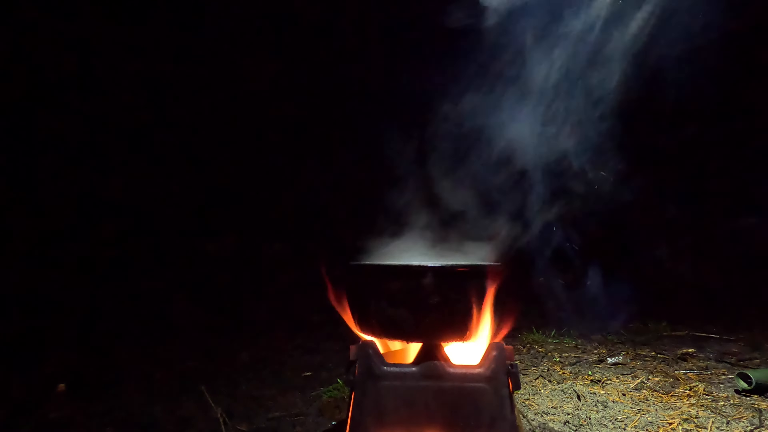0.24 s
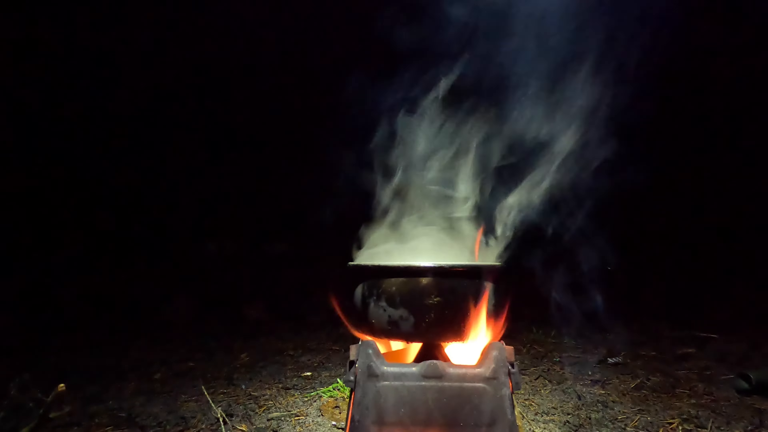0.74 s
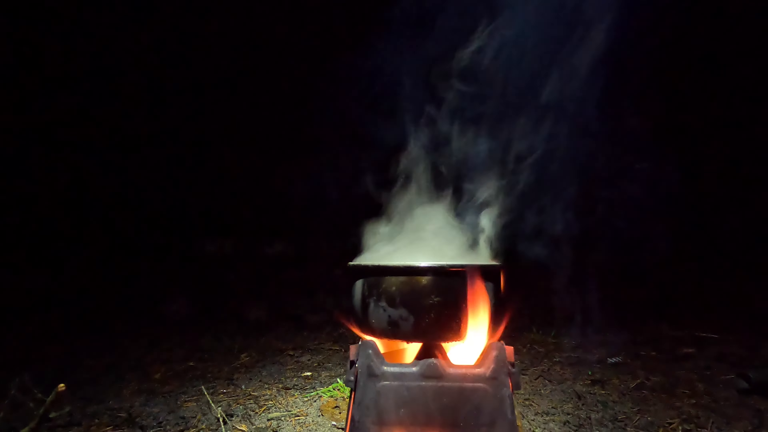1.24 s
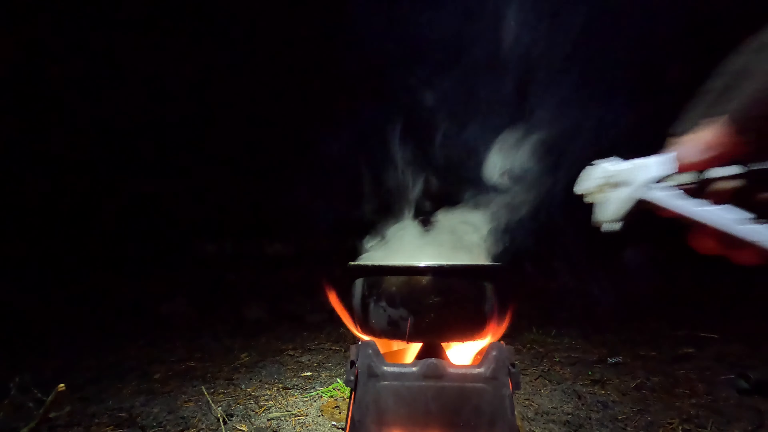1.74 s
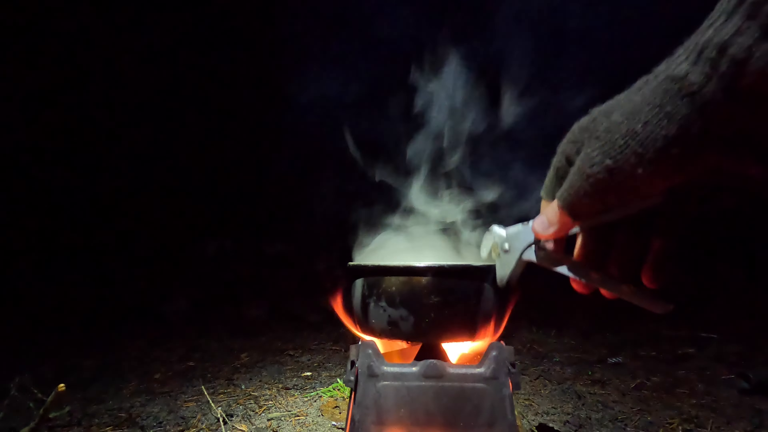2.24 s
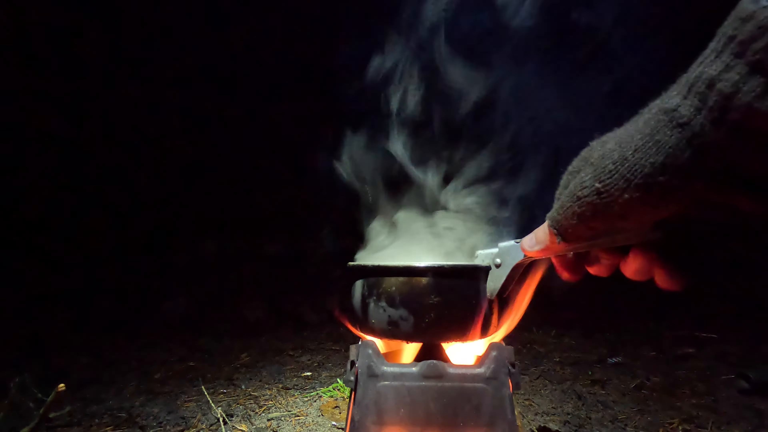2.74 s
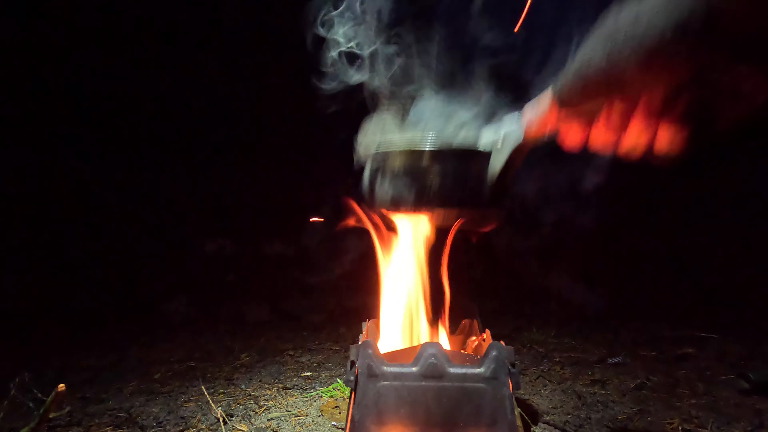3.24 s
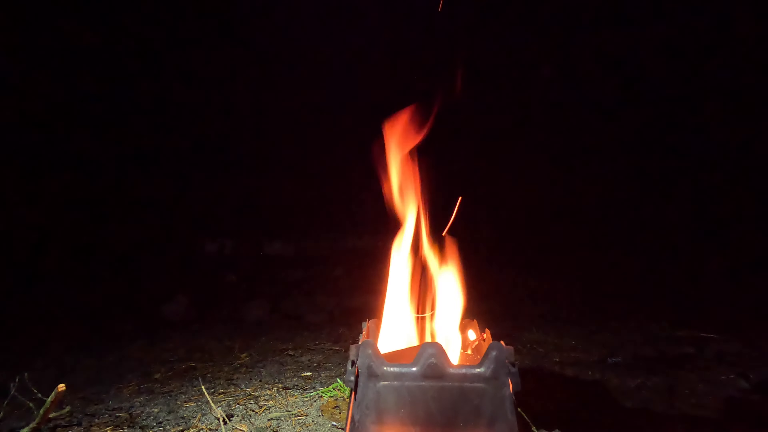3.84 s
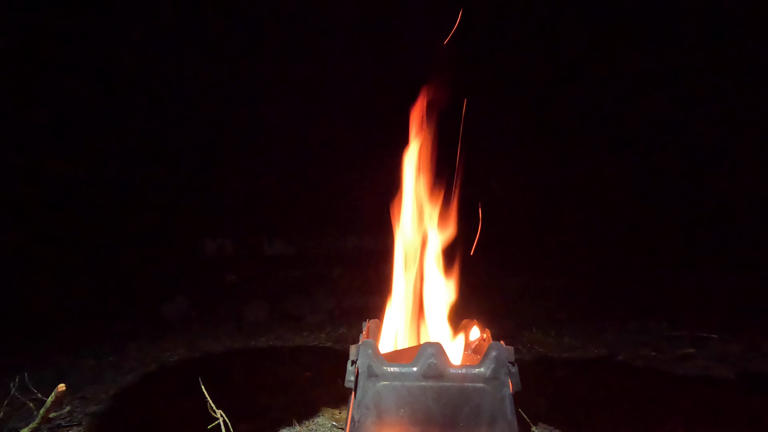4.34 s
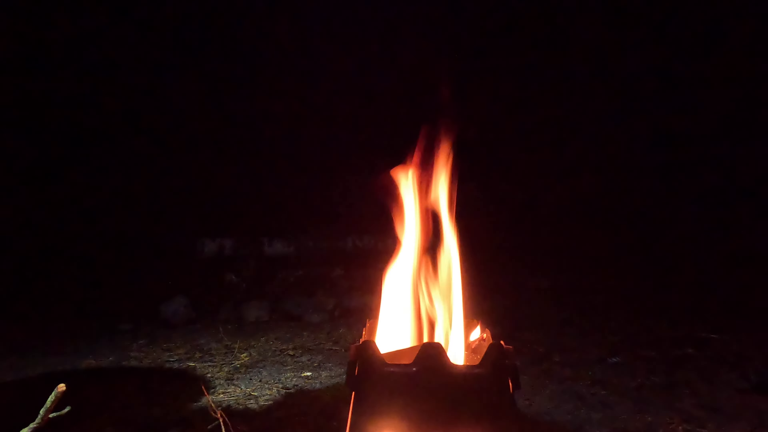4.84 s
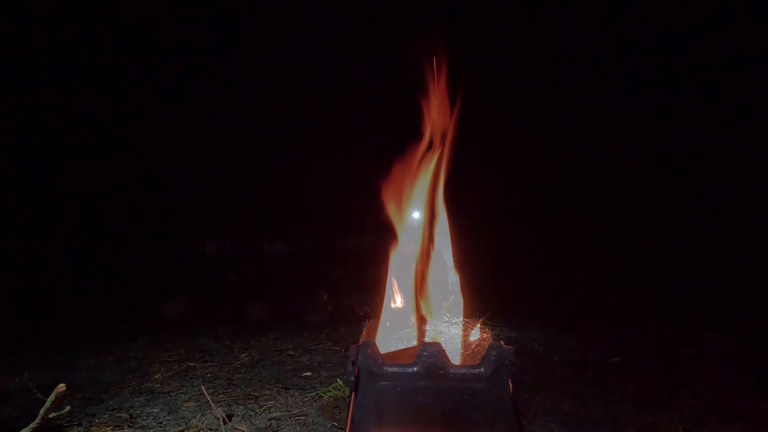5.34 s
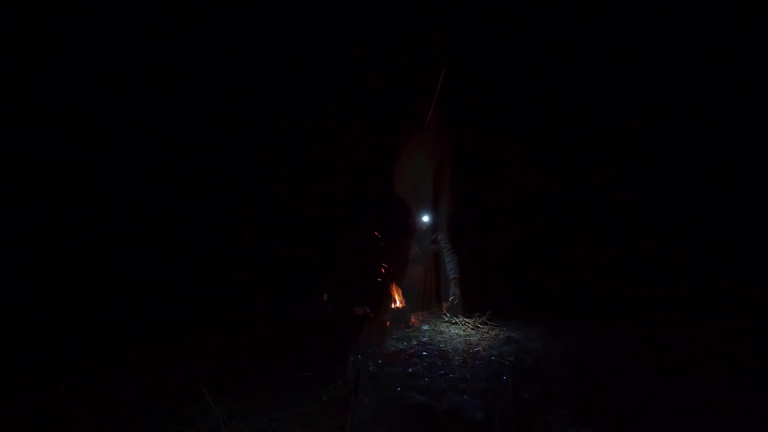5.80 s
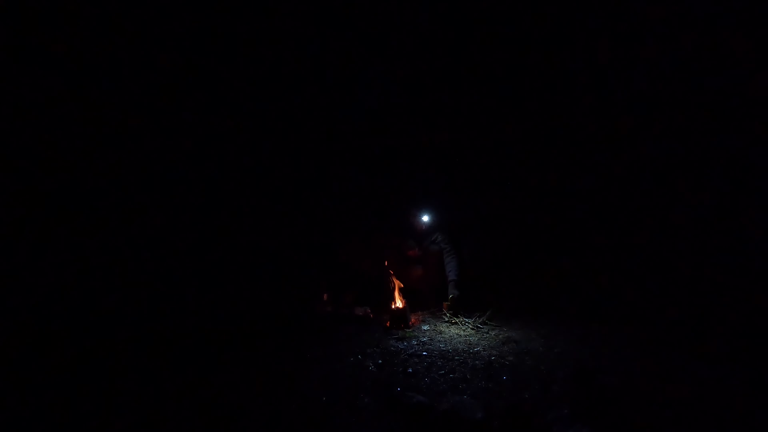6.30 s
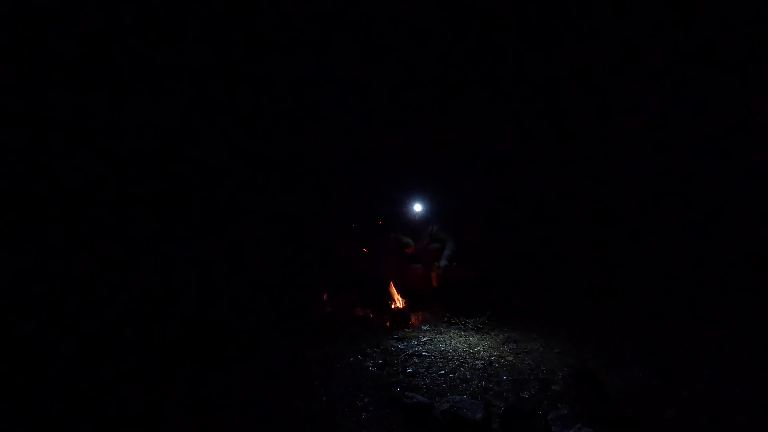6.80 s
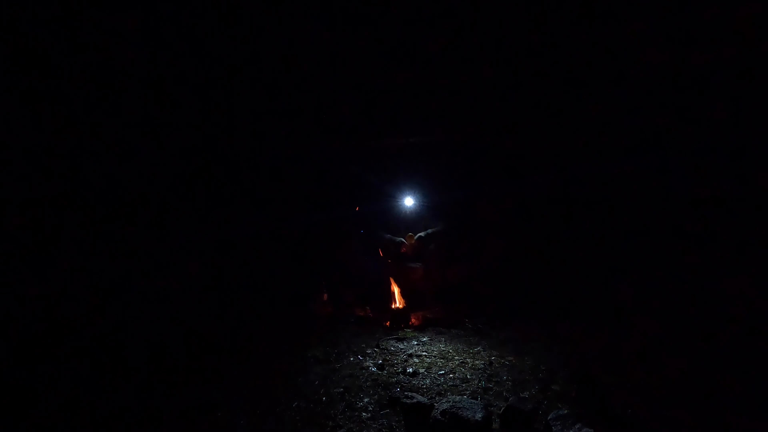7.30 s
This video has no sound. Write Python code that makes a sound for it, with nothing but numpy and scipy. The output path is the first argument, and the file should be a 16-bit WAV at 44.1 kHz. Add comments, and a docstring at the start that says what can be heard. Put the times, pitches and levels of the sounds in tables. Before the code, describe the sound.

Crackling stove fire with a faint simmering pot, small metal clinks, a gripper's clack, and irregular water drops tapping stretched cloth overhead.

```python
"""Twig stove under a tarp, wet forest, night

Wood snaps are noise bursts with two echoes; stray drops thud on the cloth as bursts with overtones.
A metal lid is set down, a gripper knocks on the pot and its jaw chatters: contacts drive decaying modes.
Coloured noise makes flame rumble, drone, sizzle and hiss; resonant noise the simmer, ringing ticks the spits.
Simmer fades from midway; flame, sizzle and hiss sink later, the drone stays."""
import sys
import numpy as np
from scipy import signal
from scipy.fft import rfft, irfft, next_fast_len
from scipy.io import wavfile

SR = 44100
rng = np.random.default_rng(int(sys.argv[2]) if len(sys.argv) > 2 else 0)


def output_pcm(signal):
    """Save a mono or channel-first signal as 16-bit PCM at the path in sys.argv[1].

    Samples are clipped to [-1, 1] before scaling.
    """
    pcm = np.clip(np.atleast_2d(signal).T, -1, 1) * 32767
    wavfile.write(sys.argv[1], SR, np.round(pcm).astype(np.int16))


N = 333376

# Loud wood snaps: (time [s], mid-band level [dB], treble level [dB], treble pitch [Hz], left over right [dB])
SNAPS = [(0.066, -33, -48, 5800, 0.1), (0.0822, -27.5, -15.5, 8040, 0), (.3547, -16, -12, 6800, -1),
         (0.7466, -32.5, -59, 6000, -8), (1.845, -50, -38, 7500, 3), (1.9152, -48, -29.5, 7600, -0.5),
         (2.0908, -42, -35, 7000, -2), (2.2089, -46, -32.5, 7950, -4), (2.234, -19.5, -12.5, 6950, -1),
         (2.3138, -29, -16, 7500, -1), (2.4336, -39, -33, 9000, -1), (2.8537, -36, -25, 6600, 0.5),
         (2.9655, -18, -13.5, 6740, -2.5), (3.0691, -40, -29.5, 9300, -2), (3.329, -31, -34, 6000, -1),
         (3.3563, -37, -28.5, 7200, -4), (3.7476, -41.5, -35, 7100, -6), (3.8871, -45, -36, 6800, -2),
         (4.175, -46, -34.5, 8150, 4), (4.3885, -28.5, -8, 9700, 0.5), (4.5812, -42, -30, 8750, -2),
         (4.9697, -39, -46, 6000, 5), (4.975, -40, -31, 7000, 3), (5.146, -42, -35.5, 8500, 2),
         (5.27, -33.5, -52, 6100, -2), (5.4524, -42, -30.5, 9400, 0), (5.4667, -43, -34, 8300, -3),
         (5.572, -45, -28.5, 9150, -3.5), (5.614, -35, -31.5, 9200, 0), (5.7074, -25.5, -32.5, 5570, -1.5),
         (5.893, -45.5, -40, 7800, 2), (6.2006, -51, -35, 10800, 12), (6.506, -42, -55, 6000, 0.1),
         (6.961, -45, -43, 6900, 4)]
# Flame puffs: (time [s], peak [dB], pitch [Hz])
PUFFS = [(.32, -38, 90.5), (1.166, -39, 81), (1.649, -41.5, 45), (3.47, -35.5, 93.5), (4.762, -42, 70.4),
         (4.871, -38.5, 65), (5.278, -29, 92)]
SMALL_SNAP_DB = -61.5  # at mean vigour, before random size and tone
# Drops on cloth: (time [s], slap level [dB], slap pitch [Hz], thump over slap [dB], overtones over slap [dB],
# splash over slap [dB], length [1 = usual], left over right [dB])
DROPS = [(0.2054, -35, 1280, -29, -17, -40, 1.5, -1), (1.506, -17, 1136, -10.5, 0, -4, 0.94, 2),
         (2.008, -24, 1380, -7.5, 2, -3, 1.2, 1.5), (2.257, -27.5, 1300, -2.5, -10, -32, 1.4, -0.5),
         (2.2909, -21.5, 1050, -11.5, -2.5, -7, 0.7, 2), (2.7763, -34, 1100, 2, -0.5, 0.5, 1.1, 3),
         (3.1825, -21, 1087, -6, -2, -24, .8, 1), (3.662, -41, 874, -8, 7, -2, 1.2, -1),
         (3.7978, -38, 1150, -8, -16, -44, 1, 3), (4.3332, -50.5, 700, -17, 1, 11, 1, -3),
         (4.5475, -39.5, 1880, -11, -3, -6, 1, 3), (5.2756, -55.5, 624, 16, 0, 10, 0.86, -1),
         (5.416, -28, 1373, -14.5, -6.5, -23, 0.73, -1), (5.5961, -35.5, 900, -13.5, 4, -25, 1.7, -0.5),
         (6.0335, -36.5, 1310, -25, -10, 3, 1.1, -0.5), (6.2243, -32.5, 1325, -15.5, 1.5, 9, 0.88, -1.5),
         (6.25, -36, 1085, -39, 5, -6, 1.5, -1), (6.2964, -49.5, 1360, -33, 0.5, 12.5, 1.3, 0),
         (6.4964, -33.5, 920, -15, 2, -2.5, 1, -1.5), (6.596, -47, 1020, -23, -3, -8, 1, -1),
         (6.6428, -40, 800, -21, 3.5, -1, 1.1, -1.5), (6.738, -32, 1344, -1, 1.5, 11.5, 1.4, -0.5),
         (6.7534, -32.5, 1030, -38, 0.5, -10, 1.8, 0), (6.9115, -38, 1270, -13.5, 4, -9, 2.6, -2),
         (7.2758, -48.5, 1300, -9, -0.5, 12.5, 0.91, -1)]
# Decay of a drop of length 1, per band: (t60 [s])
DROP_T60_S = [0.049, 0.035, 0.023, 0.0084]
THUMP_HZ, SPLASH_HZ, DROP_SPREADS_S = 256, 6800, .0012
OVERTONE_STEP = .83  # spacing as share of slap pitch
OVERTONE_WIDTH_HZ, OVERTONE_FALL_DB = 520, 2.5  # width at length 1; fall per overtone

# Burst bands, low to high: (lower edge [Hz], upper edge [Hz])
BANDS_HZ = [(90, 420), (700, 1800), (1800, 4700), (5400, 14500)]
BAND_FILTERS = [signal.butter(2, edges, "band", fs=SR, output="sos") for edges in BANDS_HZ]
# Left-right difference of a burst, per band: (amplitude [share])
WIDTH = [0.011, 0.092, 0.5, 0.014]
# Scattered tail of a burst, per band: (t60 [s])
TAIL_T60_S = [0.18, 0.16, 0.14, 0.094]

# Lid touches: (time [s], level [dB], brightness [dB per octave], rattle decay [s], damping [1 = free], scrape [dB])
LID_HITS = [(.001, -55, -5, 0.0039, 3.5, -50), (.095, -55, -8.5, 0.0049, 5, -46),
            (.287, -50.5, -4.5, 0.008, 0.49, -40.5), (.308, -47.5, 7.5, 0.01, 5.2, -34),
            (.327, -48, -1, 0.0096, 1.9, -32.5), (.41, -50, -5, 0.0146, 1.2, -51),
            (.4275, -39.5, 2.5, 0.016, 1.2, -44), (.45, -40.5, -4.5, 0.0066, 0.84, -45),
            (.4638, -36.5, 8.5, 0.01, 1.44, -21.5), (.574, -40.5, -6.5, 0.00063, 2.8, -32.5),
            (.612, -53, -5.5, 0.00039, 1.6, -33.5), (.66, -77, -5, 0.0019, 0.7, -39)]
# Lid modes: (pitch [Hz], level [dB], t60 at damping 1 [s])
LID = [(665, -5, .35), (1168, -1, .6), (1340, -17, .5), (1397, -5, .1), (1809, -24, .5), (1978, -20, .7),
       (2584, -7, .4), (2950, -23, .6), (3553, -3, .22), (3585, -5, .07), (4430, -16, .22), (4560, -9, .07),
       (5335, -18, .14), (5556, -20, .17), (6056, -17, .06)]
# Holding times that stop the lid ringing: (time [s])
LID_HELD_S = [.345, .574, .662, .72]
LID_DOWN_S = .57
# Change of each lid mode once the lid is down: (level [dB])
LID_DOWN_DB = [7.5, -8.5, -15, 1, 15, 14.5, 5, 19.5, -12, -13, 8, -7, 17, 7, 0.1]
# Gripper on pot: (time [s], level [dB], brightness [dB per octave], rattle decay [s], damping [1 = free], scrape [dB])
POT_HITS = [(2.3255, -31, 2, 0.0019, 1.26, -12), (2.4605, -44, 1, 0.0044, 1.45, -31),
            (2.672, -49.5, 8, 0.02, 3.1, -38)]
# Pot modes: (pitch [Hz], level [dB], t60 at damping 1 [s])
POT = [(310, -16, .1), (684, -19, .15), (1055, -17, .12), (1230, -3, .065), (1314, -12, .08),
       (2213, -2, .16), (3182, -3, .16), (4068, -6, .13), (4867, -19, .2), (5604, -15, .25),
       (6336, -13, .08)]
# Holding times that stop pot and jaw ringing: (time [s])
POT_HELD_S = [2.45, 2.545, 2.696, 2.8]
JAW_S, JAW_DB, JAW_GAP_S = 2.6953, -29.5, 0.001212
# Jaw modes: (pitch [Hz], level [dB], t60 [s])
JAW = [(390, -4.5, 0.036), (2670, -1, 0.037), (3440, 0.5, 0.014), (4290, 6, 0.017), (4850, -3.5, 0.032),
       (5460, 1, 0.041)]

# Sizzle level before flutter: (time [s], level [dB])
SIZZLING = [(0, -60.5), (.5, -57.5), (.9, -61.5), (2.9, -58), (3.3, -60.5), (3.83, -58.5), (4.15, -65),
            (4.45, -63), (4.88, -56.5), (5.05, -62), (5.2, -58.5), (5.3, -67), (6.45, -71.5), (7.2, -68.5),
            (7.56, -71.5)]
# Sizzle balance as the pot is carried: (time [s], left over right [dB])
SIZZLE_SIDE = [(0, -1.5), (3.3, -1), (4.1, 1.5), (4.7, 6.5), (5.4, 3.5), (5.7, 0)]
# Sizzle colour: (frequency [Hz], relative density [dB])
SIZZLE = [(400, -15), (600, -14), (911, -9), (1190, -0.5), (1500, -5.5), (2220, -6.5), (2840, -6.5),
          (3820, -9.5), (5000, -12.5), (7000, -17.5)]
SPITS_PER_S, SPIT_UNDER_SIZZLE_DB = 170, -9.5  # rate before clumping
SPIT_CYCLES = 7.1  # cycles to fall 60 dB
# Simmer resonances of the pot: (centre [Hz], width [Hz], level [dB])
SIMMER = [(2204, 340, 2.5), (3550, 400, -9.5), (5550, 300, -8.5), (7450, 260, -10.5), (8960, 570, -5)]
SIMMER_DB, LIFT_S, LIFT_TAKES_S, LIFT_LOSS_DB = -68.5, 3.13, 1.7, -27

# Flame vigour, as rumble level before flutter: (time [s], level [dB])
VIGOUR = [(0, -65.5), (.5, -72.5), (.95, -72.5), (1.45, -70.5), (1.96, -71), (2.3, -66.5), (3.3, -65),
          (4.15, -67), (4.88, -65), (5.2, -65), (5.4, -71.5), (6.75, -74), (7.56, -75)]
# Flame rumble colour: (frequency [Hz], relative density [dB])
FLAME = [(15, -15), (30, 5.5), (60, 2), (110, -1), (200, -21)]
# Flame roar colour: (frequency [Hz], relative density [dB])
ROAR = [(150, -8.5), (240, -1), (320, -1.5), (420, -8.5), (600, -17.5), (900, -28)]
ROAR_DB = -67.5  # at mean vigour, before flutter
# Far drone level: (time [s], level [dB])
DRONING = [(0, -65.5), (.8, -64.5), (1.96, -69.5), (2.23, -63.5), (4.9, -64.5), (5.3, -67), (6.45, -65),
           (7.56, -61)]
# Far drone colour: (frequency [Hz], relative density [dB])
DRONE = [(100, -60), (140, -1.5), (175, -2), (215, -6), (270, -24)]
# Hiss colour: (frequency [Hz], relative density [dB])
HISS = [(2500, -12), (4000, -8.5), (5200, -1.5), (6500, -1), (7800, 0.5), (8300, -3.5), (9500, 3.5),
        (10300, -12), (12000, -26)]
# Colour of the top of the hiss: (frequency [Hz], relative density [dB])
HISS_TOP = [(7000, -7.5), (10500, 2), (13000, 2), (14400, -11), (15300, -24)]
HISS_TOP_DB = -12  # relative to the hiss
HISS_DB, HISS_SINKS_DB, SINK_S, SINK_TAKES_S = -65.5, -9, 5.17, 0.58

HITS_TOP_HZ, TOP_FROM_HZ, CUTOFF_HZ = 9260, 8000, 16450


def from_db(db):
    """Decibels to gain."""
    return 10 ** (np.asarray(db) / 20)


def rms_one(x):
    """Scale to rms 1."""
    return x / np.sqrt(np.mean(x ** 2) + 1e-20)


def sides(pan_db):
    """Left and right gain for a level difference."""
    return from_db(np.array([pan_db / 2, -pan_db / 2]))


def add(out, x, time_s):
    """Mix a short stereo sound in at a time."""
    i = int(round(time_s * SR))
    out[:, i:i + x.shape[1]] += x[:, :N - i]


def in_time(rows):
    """Interpolate a curve at every sample."""
    return np.interp(np.arange(N) / SR, *np.transpose(rows))


def drift(knots_per_s):
    """Random curve: straight lines between normal knots of spread 1."""
    knots = rng.standard_normal(int(N / SR * 60) + 2)
    return np.interp(np.arange(N) / SR * knots_per_s, np.arange(len(knots)), knots)


def bandpass(x, centre_hz, width_hz):
    """Second-order resonance band."""
    edges = [centre_hz - width_hz / 2, centre_hz + width_hz / 2]
    return signal.sosfilt(signal.butter(2, edges, "band", fs=SR, output="sos"), x)


def ring_mode(x, hz, decay_db_per_s):
    """Two-pole resonator: a decaying sine per impulse."""
    r = from_db(-decay_db_per_s / SR)
    w = 2 * np.pi * hz / SR
    return signal.lfilter([0, np.sin(w)], [1, -2 * r * np.cos(w), r * r], x)


def bed_noise(spectrum, alike, grain_db):
    """Coloured stereo noise, rms 1; alike is channel correlation, grain_db makes single samples stand out."""
    size = next_fast_len(N)
    hz, db = np.transpose(spectrum)
    bins_hz = np.arange(size // 2 + 1) * SR / size
    colour = from_db(np.interp(np.log(bins_hz + 1), np.log(hz), db, -90, -90))
    grains = from_db(grain_db * np.minimum(rng.exponential(1, size), 9))
    white = rng.standard_normal((2, size)) * grains
    mid, side = irfft(rfft(white) * colour, size)[:, :N]
    return rms_one(np.sqrt(1 + alike) * mid + np.sqrt(1 - alike) * side * [[1], [-1]])


def burst(peaks_db, t60s, spike, tail_db, slap_hz=None, top_hz=None, rise_s=1e-5, length=1):
    """One sharp push, noise that dies band by band, and a faint scattered tail."""
    t = np.arange(SR // 8) / SR
    mid, side = rng.standard_normal((2, len(t)))
    count = len(t60s)  # the upper bands, if fewer than four
    filters = list(BAND_FILTERS)
    if slap_hz:  # struck cloth favours a pitch of its own
        filters[0] = signal.butter(2, [THUMP_HZ / 1.71, THUMP_HZ * 1.545], "band", fs=SR, output="sos")
        filters[1] = signal.butter(1, [slap_hz / 1.16, slap_hz * 1.14], "band", fs=SR, output="sos")
    if top_hz:  # so does the treble of a snap
        filters[3] = signal.butter(1, [top_hz / 1.39, top_hz * 1.214], "band", fs=SR, output="sos")
    out = 0
    rows = zip(peaks_db, t60s, filters[-count:], WIDTH[-count:], TAIL_T60_S[-count:])
    for peak_db, t60, sos, wide, tail_t60 in rows:
        shape = from_db(-60 * t / t60) * (1 - np.exp(-t / rise_s))
        tail = from_db(tail_db - 60 * t / tail_t60) * (1 - np.exp(-t / 0.0057))
        pair = mid * shape + side * (wide * shape + tail) * [[1], [-1]] + mid[::-1] * tail
        # push energy scales with that of the noise after it
        pair[:, int(rise_s * SR / 2)] = spike * np.sqrt(t60 * SR / 14)
        if slap_hz and sos is filters[2]:
            band = overtones(pair, slap_hz, length)
        else:
            band = signal.sosfilt(sos, pair)
        out = out + from_db(peak_db) * band / np.abs(band).max()
    return out


def snap(mid_db, top_db, top_hz, pan_db):
    """A fibre bursts; stove wall and ground answer at once, unlike in left and right."""
    x = burst([mid_db - 14.5, mid_db, top_db], [.012, .008, .006], spike=1.0, tail_db=-28.5, top_hz=top_hz)
    for lag_s, echo_db in [(.0012, -11), (.003, -16)]:
        x = x + from_db(echo_db) * np.roll(x, round(lag_s * SR)) * [[1.2], [.8]]
    return x * sides(pan_db)[:, None]


def puff(peak_db, hz):
    """A gas pocket lights: a low sine swell under a Gaussian, alike on both sides."""
    cycles = np.arange(-SR // 16, SR // 16) / SR * hz
    return from_db(peak_db) * np.sin(2 * np.pi * cycles) * np.exp(-(cycles / 0.19) ** 2) * [[1], [1]]


def fire():
    """Loud snaps, random small snaps whose level follows the flame, and low puffs."""
    out = np.zeros((2, N))
    for time_s, mid_db, top_db, top_hz, pan_db in SNAPS:
        add(out, snap(mid_db, top_db, top_hz, pan_db), time_s - .0003)
    vigour_db = in_time(VIGOUR)
    swing_db = vigour_db - vigour_db.mean()
    for when, size, tone, pitch, pan in rng.random((190, 5)):
        level_db = SMALL_SNAP_DB + swing_db[int(when * N)] - 5 * np.log(size + 0.16)
        dull_db = 14 * (tone - .5)
        x = snap(level_db - 2.5 + dull_db, level_db - dull_db, 5500 + 4500 * pitch, 5 * (pan - .5))
        add(out, x, when * N / SR)
    for time_s, peak_db, hz in PUFFS:
        add(out, puff(peak_db, hz), time_s - 1 / 16)
    return out


def drops():
    """Each drop pushes the cloth, whose low ring outlasts the splash; fainter drops get more tail."""
    out = np.zeros((2, N))
    for time_s, slap_db, slap_hz, thump_db, over_db, splash_db, length, pan_db in DROPS:
        tail_db = -25.0 - 0.98 * (slap_db + max(over_db, 0) + 20.5)
        peaks_db = slap_db + np.array([thump_db, 0, over_db, splash_db])
        x = burst(peaks_db, length * np.array(DROP_T60_S), spike=0.91, tail_db=min(tail_db, -14),
                  slap_hz=slap_hz, top_hz=SPLASH_HZ, rise_s=DROP_SPREADS_S, length=length)
        add(out, x * sides(pan_db)[:, None], time_s - .0004)
    return out


def overtones(x, slap_hz, length):
    """Four evenly spaced cloth resonances above the slap; longer drops blur them."""
    out = 0
    width_hz = min(OVERTONE_WIDTH_HZ * length, slap_hz)
    for k in range(1, 5):
        band = bandpass(x, slap_hz * (1 + OVERTONE_STEP * k), width_hz)
        out = out + (-1) ** k * from_db(-OVERTONE_FALL_DB * k) * band
    return out


def metal(hits, modes, held_s, pan_db, down_s=9, down_db=None):
    """A short rattle of contacts drives the modes; the ring is stopped at the next listed holding time."""
    out = np.zeros((2, N))
    t = np.arange(SR // 4) / SR
    for time_s, level_db, bright_db, rattle_s, damping, scrape_db in hits:
        lasts_s = min(held for held in held_s if held > time_s + .01) - time_s
        rattle_s = max(rattle_s, .0003)
        contacts = rng.standard_normal(len(t)) * np.exp(-t / rattle_s) * (rng.random(len(t)) < .06)
        contacts[0] = 3.33
        ring = 0
        for k, (hz, mode_db, t60) in enumerate(modes):
            if time_s > down_s:
                mode_db = mode_db + down_db[k]
            # divide out what the rattle hands to this mode
            push = np.abs(contacts @ np.exp(-2j * np.pi * hz * t)) + 0.046
            gain = from_db(level_db + mode_db + bright_db * np.log2(hz / 2000)) / push
            ring = ring + gain * ring_mode(contacts, hz, 60 * damping / t60)
        ring = ring * np.exp(-np.maximum(t - lasts_s, 0) / 0.0035)
        add(out, ring * sides(pan_db)[:, None], time_s)
        peaks_db = scrape_db + np.array([-14, -5, 0, -4]) + bright_db * np.array([-.5, -.8, 0, 1])
        t60s = 6 * rattle_s + np.array([0.11, 0.047, 0.0022, 0.023])
        scrape = burst(peaks_db, t60s, spike=0.55, tail_db=-23.0, rise_s=.15 * rattle_s)
        add(out, scrape * sides(pan_db)[:, None], time_s)
    return out


def jaw():
    """The gripper jaw snaps shut and chatters: evenly spaced rebounds, each weaker."""
    hits = [(JAW_S + k * JAW_GAP_S, JAW_DB - 0.91 * k, 0, 0, 1, JAW_DB - 3.0 - 4.6 * k) for k in range(5)]
    return metal(hits, JAW, POT_HELD_S, pan_db=-3.5)


def clanks():
    """Lid, pot and jaw together, high-passed at 180 Hz."""
    lid = metal(LID_HITS, LID, LID_HELD_S, pan_db=-4.0, down_s=LID_DOWN_S, down_db=LID_DOWN_DB)
    pot = metal(POT_HITS, POT, POT_HELD_S, pan_db=-2.0)
    return signal.sosfilt(signal.butter(2, 180, "high", fs=SR, output="sos"), lid + pot + jaw())


def flame():
    """Fluttering low rumble plus a roar that follows its vigour."""
    vigour_db = in_time(VIGOUR)
    roar_db = ROAR_DB + vigour_db - vigour_db.mean()
    rumble = from_db(vigour_db + 3.3 * drift(7.7)) * bed_noise(FLAME, alike=.98, grain_db=-3)
    roar = from_db(roar_db + 3.7 * drift(25)) * bed_noise(ROAR, alike=0.7, grain_db=4.0)
    return rumble + roar


def sizzle():
    """Grainy fluttering noise from the pot, panned as it is carried."""
    level_db = in_time(SIZZLING) + 2.23 * drift(14.0)
    return from_db(level_db) * bed_noise(SIZZLE, alike=0.67, grain_db=3.5) * sides(in_time(SIZZLE_SIDE))


def spits():
    """Tiny clumped ticks from the sizzling pot, each ringing a few cycles at one of 12 pitches."""
    sizes = from_db(5.2 * np.minimum(rng.exponential(1, N), 4)) * rng.choice([-1, 1], N)
    born = rng.random(N) < SPITS_PER_S * from_db(4.0 * drift(9.0)) / SR
    dealt = rng.integers(0, 12, N)
    out = 0
    for k, hz in enumerate(np.geomspace(1050, 7500, 12)):
        ticks = sizes * born * (dealt == k) + 1e-18
        out = out + ring_mode(ticks, hz, 60 * hz / SPIT_CYCLES)
    level = from_db(in_time(SIZZLING) + SPIT_UNDER_SIZZLE_DB)
    return level * rms_one(out) * sides(in_time(SIZZLE_SIDE))


def simmer():
    """Noise through the resonances of the pot, fading as the pot is lifted away."""
    white = bed_noise([(1000, 0), (12000, 0)], alike=1.0, grain_db=4.0)  # flat between the edges
    out = 0
    for hz, width_hz, db in SIMMER:
        out = out + from_db(db) * rms_one(bandpass(white, hz, width_hz))
    fade_db = in_time([(LIFT_S, 0), (LIFT_S + LIFT_TAKES_S, LIFT_LOSS_DB)])
    return from_db(SIMMER_DB + fade_db) * out


def drone():
    """Far low noise with a slowly changing level."""
    return from_db(in_time(DRONING)) * bed_noise(DRONE, alike=0.84, grain_db=1.5)


def hiss():
    """Steady high hiss with a wider, fainter top, sinking once."""
    level_db = HISS_DB + in_time([(SINK_S, 0), (SINK_S + SINK_TAKES_S, HISS_SINKS_DB)])
    body = bed_noise(HISS, alike=1.0, grain_db=3.5)
    top = from_db(HISS_TOP_DB) * bed_noise(HISS_TOP, alike=0.2, grain_db=-4)
    return from_db(level_db) * (body + top)


def scene():
    """Hits are dulled by a low-pass near 9 kHz, plus a faint top, stronger left, one sample late right; then beds."""
    hits = fire() + drops() + clanks()
    dulled = signal.sosfilt(signal.butter(5, HITS_TOP_HZ, fs=SR, output="sos"), hits)
    top = from_db(-22) * signal.sosfilt(signal.butter(4, TOP_FROM_HZ, "high", fs=SR, output="sos"), hits)
    top = np.array([2.1 * top[0], np.roll(top[1], 1)])
    return dulled + top + flame() + sizzle() + spits() + simmer() + drone() + hiss()


def record(dry):
    """Cut the top with a steep low-pass."""
    return signal.sosfilt(signal.cheby2(12, 70, CUTOFF_HZ, fs=SR, output="sos"), dry)


dry = scene()
out = record(dry)
output_pcm(out)
```